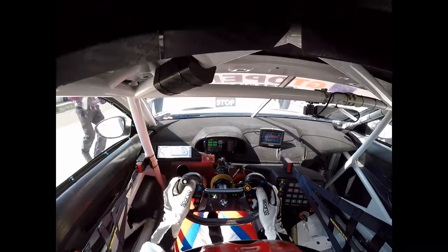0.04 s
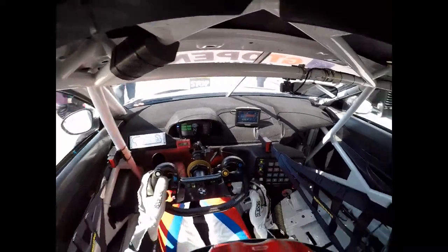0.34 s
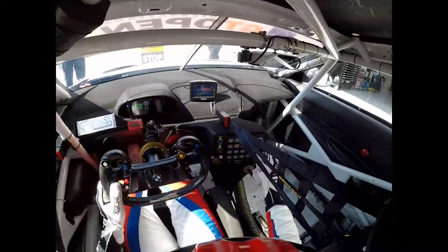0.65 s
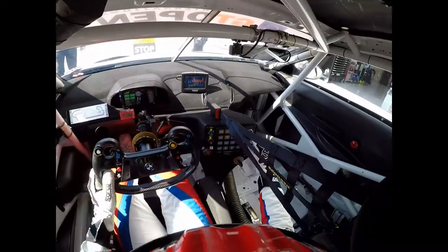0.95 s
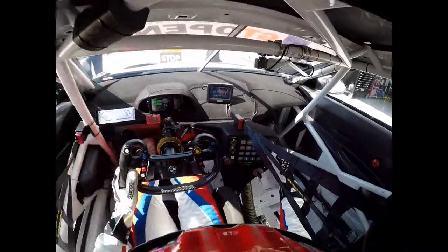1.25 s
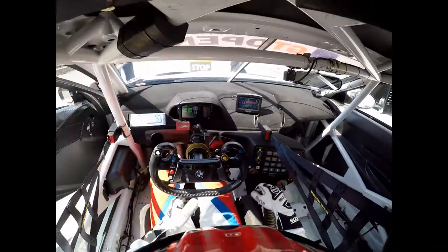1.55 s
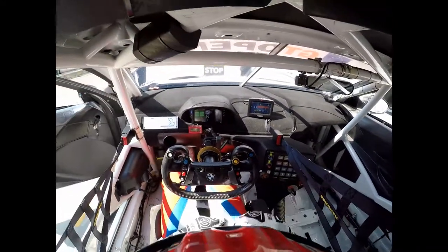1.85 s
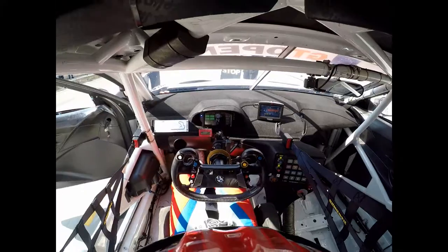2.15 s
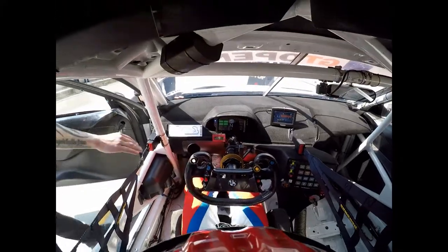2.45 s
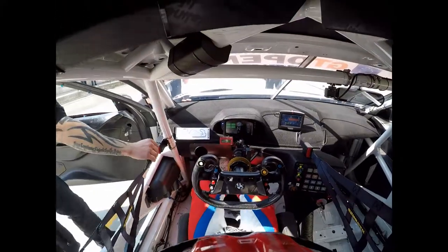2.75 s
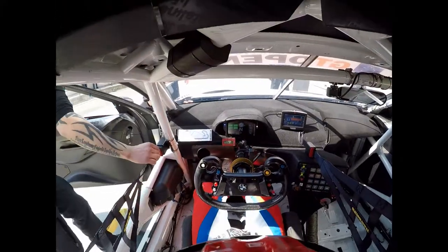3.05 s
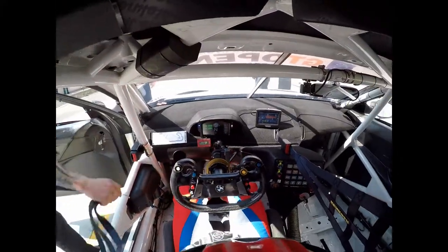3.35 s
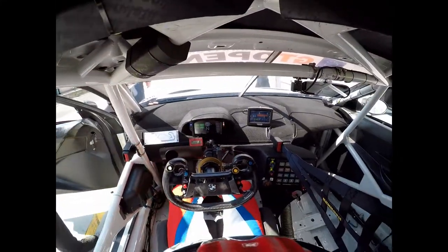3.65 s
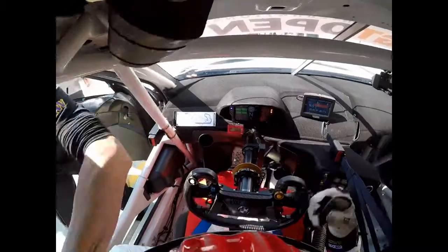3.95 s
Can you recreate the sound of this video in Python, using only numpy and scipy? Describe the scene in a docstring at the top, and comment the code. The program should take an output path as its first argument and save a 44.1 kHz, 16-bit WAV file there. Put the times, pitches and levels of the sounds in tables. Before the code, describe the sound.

Inside a parked race car, the engine drones with gear whine, booms as the door opens, then cuts out with rattling knocks. Fans keep whining over rushing air, with a small clink, before slowing as something clunks.

```python
"""A V8 idles fast with clattering gears, heard inside a race car standing in the pits.
The door opens and the cabin booms. Switched off, the engine shudders to rest on its mounts,
leaving two electric blowers whining over rushing air. Something clinks, perhaps a buckle;
the blowers run down, and something clunks as the sound dies away."""
import sys
import numpy as np
from scipy import signal
from scipy.fft import rfft, irfft
from scipy.io import wavfile
from scipy.ndimage import uniform_filter1d

SR = 44100
rng = np.random.default_rng(int(sys.argv[2]) if len(sys.argv) > 2 else 0)


def waveform_to_disk(signal):
    """Save audio, clipped to [-1, 1], as 16-bit WAV at the path in sys.argv[1]."""
    frames = np.transpose(np.atleast_2d(signal))
    scaled = np.clip(frames, -1, 1) * 32767
    samples = np.round(scaled).astype(np.int16)
    wavfile.write(sys.argv[1], SR, samples)


N = 176400
T = np.arange(N) / SR
FREQS = np.arange(N // 2 + 1) * SR / N


def amp(db):
    """Decibels to gain."""
    return 10 ** (np.asarray(db) / 20)


def unit(x):
    """Scale to rms 1."""
    return x / np.sqrt(np.mean(x ** 2))


def curve(rows):
    """Interpolate (t/s, value) rows linearly."""
    return np.interp(T, *np.array(rows).T)


def at(rows, hz):
    """Interpolate (f/Hz, value) rows on a log axis."""
    f, v = np.array(rows).T
    return np.interp(np.log(np.maximum(hz, 1)), np.log(f), v)


def ramp(start_s, rise_s):
    """Linear rise from 0 to 1."""
    return np.clip((T - start_s) / rise_s, 0, 1)


def burst(start_s, hold_s, attack_s, release_s):
    """Attack, hold, exponential release."""
    onset = ramp(start_s - attack_s / 2, attack_s)
    return onset * np.exp(-np.maximum(T - start_s - hold_s, 0) / release_s)


def drift(rate_hz):
    """Smooth random drift, rms 1."""
    span = max(int(SR / rate_hz), 1)
    smoothed = uniform_filter1d(rng.standard_normal(N), span, mode="wrap")
    return unit(uniform_filter1d(smoothed, span, mode="wrap"))


def noise():
    """Two independent white noises."""
    return rng.standard_normal((2, N))


def resonate(x, hz, width_hz):
    """One resonance, gain 1 at its centre."""
    damping = 1j * FREQS * width_hz
    return irfft(rfft(x) * damping / (hz ** 2 - FREQS ** 2 + damping), N)


def ring(start_s, modes):
    """Strike (f/Hz, t60/s, level/dB) modes once."""
    age = np.maximum(T - start_s, 0)
    return sum(amp(db - 60 * age / t60) * np.sin(2 * np.pi * hz * age) for hz, t60, db in modes)


# Stereo width: f/Hz, side over mid/dB
WIDTH = [(60, -20), (150, -15), (300, -9), (550, 1), (1100, 1), (2000, -1.5), (4500, -2.5), (8000, 0)]

def colour(pair, spectrum):
    """Shape two signals into stereo at rms 1: shared bass, diffuse treble."""
    mid, side = rfft(pair) * amp(at(spectrum, FREQS))
    side = side * amp(at(WIDTH, FREQS))
    return unit(irfft(np.array([mid + side, mid - side]), N))


# Phase across the cabin: f/Hz, left lead/rad
LEFT_LEAD = [(100, 0), (320, .4), (500, -.5), (590, -1.7), (1130, -2.75), (1390, -5), (1750, -5.5),
             (2800, -6.3)]

def tones(shaft_hz, orders, waver_db, waver_hz, wander_rad=0):
    """Wavering tones at multiples (orders) of a shaft's speed, out of step left and right."""
    angle = 2 * np.pi * np.cumsum(shaft_hz) / SR
    out = 0
    for order, db in orders:
        phase = order * angle + 2 * np.pi * rng.random() + wander_rad * drift(waver_hz)
        lead = np.outer([.5, -.5], at(LEFT_LEAD, order * shaft_hz))
        gain = amp(db + waver_db * (drift(waver_hz) - 1 / 3))
        out = out + np.sqrt(2) * gain * np.sin(phase + lead)
    return out


# Exhaust tones: crank order, level/dB
EXHAUST = [(1.5, -31), (2, -25), (3, -23.5), (4, -22)]
# Exhaust tones that stop with the ignition: crank order, level/dB
COMBUSTION = [(5, -24.5), (6, -23), (7, -30), (8, -29), (9, -29), (10, -26.5), (11, -35), (16, -32),
              (17, -39), (18, -28), (20, -31)]
DOOR_S, BOOM_HZ, BOOM_WIDTH_HZ, BOOM_DB = 1, 64.5, 17.6, 3.5

def exhaust(crank_hz, speed, ignition_off):
    """Exhaust tones follow the crank; the open door lets the cabin boom."""
    pipe = tones(crank_hz, EXHAUST, waver_db=-.6, waver_hz=8.1) * speed ** .5
    boom = amp(BOOM_DB) * resonate(pipe * ramp(DOOR_S, .077), BOOM_HZ, BOOM_WIDTH_HZ)
    firing = tones(crank_hz, COMBUSTION, waver_db=.55, waver_hz=2)
    return pipe + boom + firing * (1 - ignition_off) * speed


def teeth(cycles, count=320):
    """Gear teeth and valves tick at the same angles each engine cycle, with varying strength."""
    angles = (np.arange(count) + rng.random(count)) / count
    polarities = rng.choice([-1, 1], (2, count))
    hit_cycles = np.arange(int(cycles[-1]))[:, None] + angles
    hit_samples = np.minimum(np.searchsorted(cycles, hit_cycles.ravel()), N - 1)
    strengths = [signs * amp(2 * rng.standard_normal(hit_cycles.shape)) for signs in polarities]
    return unit(np.array([np.bincount(hit_samples, row.ravel(), N) for row in strengths]))


# Gear whine: crank order, level/dB
GEAR_WHINE = [(26, -30.5), (33, -32.5), (34.3, -23.5), (36, -19.5), (39, -28), (43.2, -31.5), (44, -27),
              (45.2, -33), (47, -31.5), (48.2, -30.5), (49.5, -32), (52.2, -32.5), (54, -36), (55.7, -30),
              (58.2, -38), (72, -40), (76.3, -42.5), (110, -43.5)]
# Clatter spectrum: f/Hz, level/dB
CLATTER = [(400, -19), (900, -11.5), (1080, -8.5), (1280, -10), (1480, -5), (1780, -7.5), (2000, -12.5),
           (2300, -13.5), (2650, -18), (3200, -18), (4200, -21), (5200, -26.5), (6800, -29), (8000, -35.5),
           (9000, -70.5), (11000, -100)]

def gears(crank_hz, speed, cycles, throb, unloaded):
    """The gears whine and clatter, more softly once unloaded."""
    flutter_hz = crank_hz * (1 + .0013 * drift(84))
    whine = tones(flutter_hz, GEAR_WHINE, waver_db=2.3, waver_hz=7, wander_rad=.25) * speed ** .91
    ticks = (.66 * teeth(cycles) + .94 * noise()) * throb
    clatter = amp(-19.5) * colour(ticks, CLATTER) * speed
    return whine * amp(-6 * unloaded) + clatter * amp(-3 * unloaded)


# Crank speed: t/s, f/Hz
CRANK = [(0, 31.55), (.23, 31.25), (.35, 31.5), (.73, 31.38), (1.28, 31.5), (1.47, 31.3), (1.56, 26.3),
         (1.65, 21.5), (1.75, 17.2), (1.82, 13.5), (1.95, 7), (2.13, 0)]
# Rumble spectrum: f/Hz, level/dB
RUMBLE = [(20, -25), (35, 2), (55, 13.5), (130, 11.5), (200, 5), (310, 9), (450, 0.5), (700, -8),
          (1200, -61.5), (9000, -110)]
IDLE_HZ, IGNITION_OFF_S, FIRING_DEPTH = 31.5, 1.465, .12

def engine():
    """The crank drives exhaust, throbbing rumble and gears, and stops after the ignition is cut."""
    crank_hz = curve(CRANK) * (1 + .0008 * drift(25))
    speed = np.maximum(crank_hz / IDLE_HZ, 1e-6)
    turns = np.cumsum(crank_hz) / SR
    ignition_off = ramp(IGNITION_OFF_S, .012)
    running = 1 - ramp(2, .13)
    beats = sum(np.cos(2 * np.pi * (order * turns + rng.random())) for order in (1, 2, 3, 4, 5, 8))
    throb = unit(np.exp(FIRING_DEPTH * beats / 2))
    drone = exhaust(crank_hz, speed, ignition_off)
    rumble = amp(-18) * colour(noise() * throb ** .5, RUMBLE) * speed ** .39
    return (drone + rumble + gears(crank_hz, speed, turns / 2, throb, ignition_off)) * running


# Fan whine: shaft order, level/dB
FAN_WHINE = [(.44, -37.5), (1, -22.5), (6, -21.5)]
# Whine envelope: t/s, level/dB
WHINE_LEVEL = [(2.2, -0.5), (2.95, 2.5), (3.35, -1), (3.65, -0.5), (3.73, 1.5)]
# Motor overtones: shaft order, level/dB
MOTOR = [(9, -46), (12, -34), (18, -41)]
# Overtone envelope: t/s, level/dB
MOTOR_LEVEL = [(2.2, 1), (3.1, -4), (3.3, 1), (3.52, 0), (3.7, -10), (3.83, -11)]
FAN_HZ, POWER_OFF_S, ECHO_S = 233.2, 3.685, .0081

def fan(speed, coast):
    """Lower blower. Coasting, its whine rings a duct, roughens and beats against its cabin echo."""
    shaft_hz = FAN_HZ * speed * (1 + .001256 * drift(40))
    whine = tones(shaft_hz, FAN_WHINE, waver_db=1.4, waver_hz=20)
    whine *= coast ** 3.06 * amp(curve(WHINE_LEVEL))
    duct = amp(8) * resonate(whine * (T > POWER_OFF_S), hz=222.7, width_hz=6.2)
    motor = tones(shaft_hz, MOTOR, waver_db=2.6, waver_hz=45, wander_rad=.7) * amp(curve(MOTOR_LEVEL))
    direct = whine + duct + motor
    power_off = ramp(POWER_OFF_S, .0067)
    echo = np.array([np.interp(T - ECHO_S, T, side * power_off) for side in direct])
    roughness = 1 + .5 * power_off * drift(160)
    return (direct + .6 * echo) * roughness


# Pump whine: shaft order, level/dB
PUMP_WHINE = [(1, -29), (1.38, -34), (2, -54), (3, -41.5)]
PUMP_HZ = 612.5

def pump(speed, coast):
    """Higher blower. Coasting, its whine falls through a duct resonance."""
    shaft_hz = PUMP_HZ * speed * (1 + .0028 * drift(65))
    whine = tones(shaft_hz, PUMP_WHINE, waver_db=2.5, waver_hz=31) * coast ** 3
    return whine + amp(10) * resonate(whine * (T > POWER_OFF_S), hz=425, width_hz=40)


# Air spectrum: f/Hz, level/dB
AIR = [(25, -12), (60, -8.5), (110, -1.5), (180, -6.5), (260, -7.5), (370, -8.5), (480, -17), (650, -20),
       (1100, -24), (1300, -15.5), (1600, -20), (2000, -24), (2600, -26.5), (3100, -22), (4500, -25),
       (6300, -26.5), (8000, -33), (9500, -51), (11000, -91)]
# Duct resonances: f/Hz, width/Hz, level/dB
DUCTS = [(247, 47, -34), (1438, 72, -39), (2070, 180, -41), (2942, 66, -35), (6050, 190, -39.5)]

def airflow(coast):
    """The air stream rushes unevenly and rings the ducts."""
    rush = amp(-20) * colour(noise() * amp(1.02 * drift(30)), AIR)
    ducts = sum(amp(db) * unit(resonate(resonate(noise(), hz, width_hz), hz, width_hz))
                for hz, width_hz, db in DUCTS)
    return rush * coast + ducts * coast ** 3.9


# Blower supply: t/s, share of full speed
SUPPLY = [(2.15, 1.001), (2.5, 1.0005), (3.05, .9975), (3.3, 1.001), (3.67, 1.002)]
# Blower envelope: t/s, level/dB
BLOWER_LEVEL = [(0, -20), (2.1, -8), (2.2, -6.5), (2.35, -4.5), (2.7, -1.5), (3.05, 0.5), (3.4, 3),
                (3.68, 5.5)]
HALF_SPEED_S, TREBLE_HZ, FADE_START_S = .38, 2200, 3.925

def blowers():
    """Two motors move air, then coast down unsteadily without power; the treble dies first."""
    coast = 1 / (1 + np.maximum(T - POWER_OFF_S, 0) / HALF_SPEED_S)
    speed = curve(SUPPLY) * coast * (1 + .0064 * drift(130) * (T > POWER_OFF_S))
    whole = fan(speed, coast) + pump(speed, coast) + airflow(coast)
    treble = irfft(rfft(whole) * FREQS ** 4 / (FREQS ** 4 + TREBLE_HZ ** 4), N)
    dulled = whole - treble * (1 - coast ** 1.6)
    fade = np.exp(-np.maximum(T - FADE_START_S, 0) / .033)
    return dulled * amp(curve(BLOWER_LEVEL)) * fade


# Body knocks: t/s, f/Hz, t60/s, thump level/dB, metal level/dB
KNOCKS = [(1.11, 24.2, 0.14, -7, -24.5), (1.88, 130, 0.056, -3.5, -27), (1.933, 102.5, 0.11, -8, -18.5),
          (1.981, 136, 0.051, -11.5, -17.5), (2.004, 124.8, 0.29, -6.5, -24),
          (2.086, 330, .16, -12.5, -19.5), (2.098, 157, .08, -4.5, -27), (3.924, 44, 0.19, -7, -24.5),
          (3.929, 115, .05, -7.5, -26.5), (3.955, 63, 0.083, -6, -38.5)]
# Metal modes: f/Hz, t60/s, level/dB
CLANK = [(856, 0.079, -6), (1301, 0.08, -3.5), (2160, 0.042, -7)]
# Rattle spectrum: f/Hz, level/dB
RATTLE = [(200, 1.5), (700, -8.5), (1500, 1.5), (2400, -5), (4500, -9), (7000, -20), (8500, -34.5),
          (10000, -77.5)]

def knocks():
    """Each knock thumps the car body, with a rattle and a clank of metal."""
    rattle = colour(noise(), RATTLE)
    out = 0
    for start_s, hz, t60, thump_db, metal_db in KNOCKS:
        metal = rattle * burst(start_s, .0037, .001, .012) + ring(start_s, CLANK)
        out = out + ring(start_s, [(hz, t60, thump_db)]) + amp(metal_db) * metal
    return out


# Mount shake spectrum: f/Hz, level/dB
SHAKE = [(25, -24), (50, -13), (85, -3.5), (130, -3), (180, -6.5), (230, -6.5), (400, -6.5), (520, -16.5),
         (800, -16.5), (1500, -25.5), (2500, -29), (4500, -34.5), (7000, -53), (10000, -88)]
# Shake envelope: t/s, level/dB
SHAKE_LEVEL = [(1.45, -31), (1.62, -14.5), (1.74, -18.5), (1.81, -14), (1.87, -16.5), (1.96, -13),
               (2.07, -14.5), (2.22, -26.5)]
# Last crank jolts: t/s, level/dB
JOLTS = [(1.722, -13), (1.763, -6), (1.785, -5.5), (1.805, -8.5), (1.829, -4.5)]
# Body panel modes: f/Hz, t60/s, level/dB
PANELS = [(121, 0.042, -3), (229, 0.14, -7.5), (305, 0.061, -6), (390, 0.045, -5)]
# Drivetrain rattles: t/s, length/s, level/dB
SLACK = [(1.488, 0.07, -20), (1.639, 0.15, -24.5), (1.885, 0.028, -19.5), (1.923, 0.086, -18.5)]

def shudder():
    """The slowing engine shakes on its mounts and rings panels; the drivetrain rattles in its slack."""
    shake = colour(noise() * amp(1.9 * drift(100)), SHAKE)
    shake *= amp(curve(SHAKE_LEVEL)) * burst(1.6, .63, .046, .075)
    panels = sum(amp(db) * ring(start_s, PANELS) for start_s, db in JOLTS)
    slack = sum(amp(db) * burst(start_s, length_s, .012, .019) for start_s, length_s, db in SLACK)
    rattle = colour(noise() * amp(1.9 * drift(410)), RATTLE)
    return shake + panels + slack * rattle


# Buckle strikes: t/s, level/dB
CLINKS = [(3.062, -22.5), (3.071, -22.5), (3.081, -22)]
# Buckle modes: f/Hz, t60/s, level/dB
BUCKLE = [(2900, .03, -1), (4330, 0.023, 0), (5981, .06, -4.5), (6450, .04, -2.5), (8340, 0.046, -10)]

def buckle():
    """Small metal clinks: each strike rings and rattles briefly."""
    rattle = colour(noise(), RATTLE)
    return sum(amp(db) * (ring(start_s, BUCKLE) + rattle * burst(start_s, .004, .001, .011))
               for start_s, db in CLINKS)


def pan(x, balance):
    """Lean each frequency left or right."""
    lean = amp(np.outer([.5, -.5], at(balance, FREQS)))
    return irfft(rfft(x) * lean / np.sqrt(np.mean(lean ** 2, axis=0)), N)


# Engine balance: f/Hz, left over right/dB
ENGINE_PAN = [(60, 1.5), (180, 1.5), (320, 5.5), (560, 8.5), (1050, -6.5), (1400, -8.5), (1750, -1),
              (3000, -5), (5200, 0.5), (9000, 9)]
# Balance of the other sources: f/Hz, left over right/dB
CABIN_PAN = [(100, 1.5), (230, 1.5), (320, 7.5), (600, 4), (970, -2.5), (1700, -2), (3000, -4), (5200, 1),
             (9000, 5.5)]
# Overall envelope, a brief dip and a late sag: t/s, level/dB
LEVEL = [(3.114, 0), (3.117, -17), (3.122, -3), (3.127, 0), (3.94, -4), (3.97, -5), (4, 0)]

def scene():
    """Everything heard from the driver's seat."""
    v8 = pan(engine(), ENGINE_PAN)
    cabin = pan(shudder() + blowers() + knocks() + buckle(), CABIN_PAN)
    return (v8 + cabin) * amp(curve(LEVEL))


CEILING, LOWPASS_HZ = .95, 10600

def record(dry):
    """Round the highest peaks and cut the top treble."""
    rounded = dry / (1 + (dry / CEILING) ** 6) ** (1 / 6)
    return signal.sosfilt(signal.ellip(8, .2, 80, LOWPASS_HZ, fs=SR, output="sos"), rounded)


dry = scene()
out = record(dry)
waveform_to_disk(out)
```